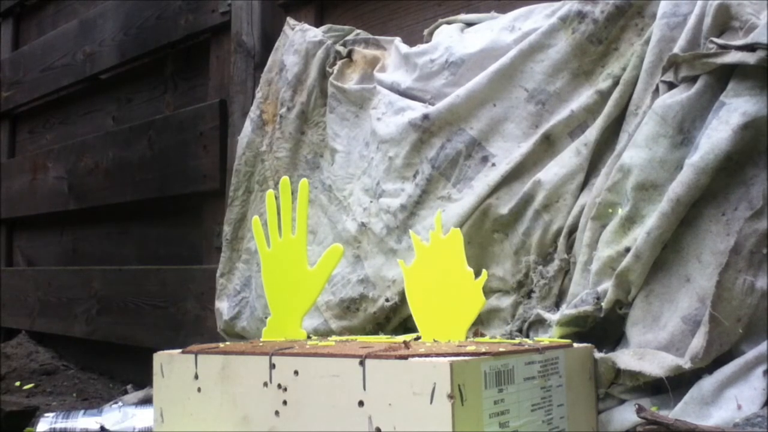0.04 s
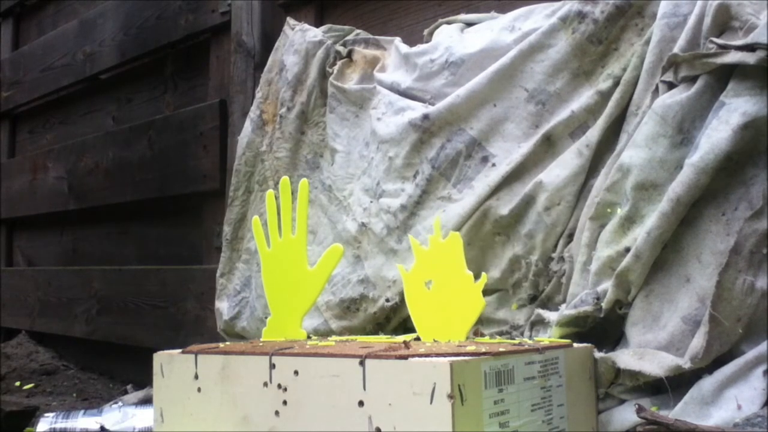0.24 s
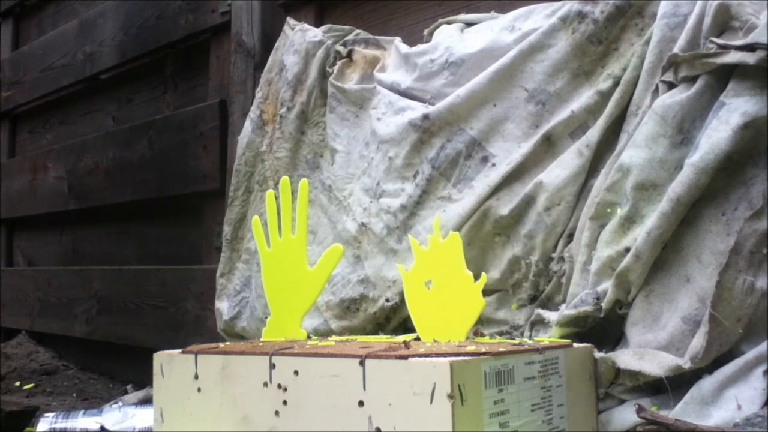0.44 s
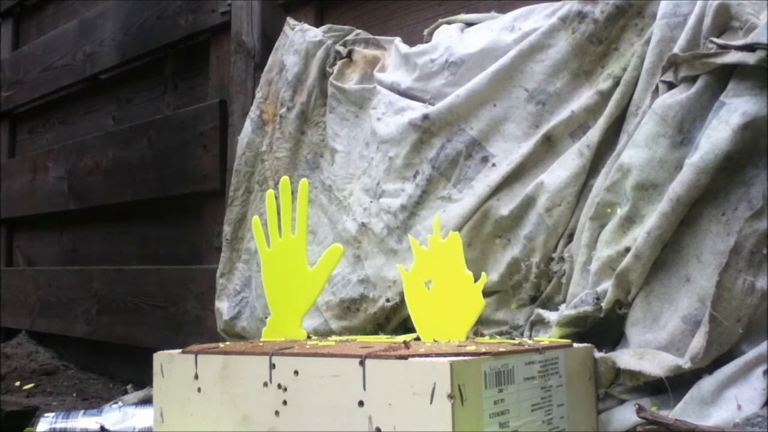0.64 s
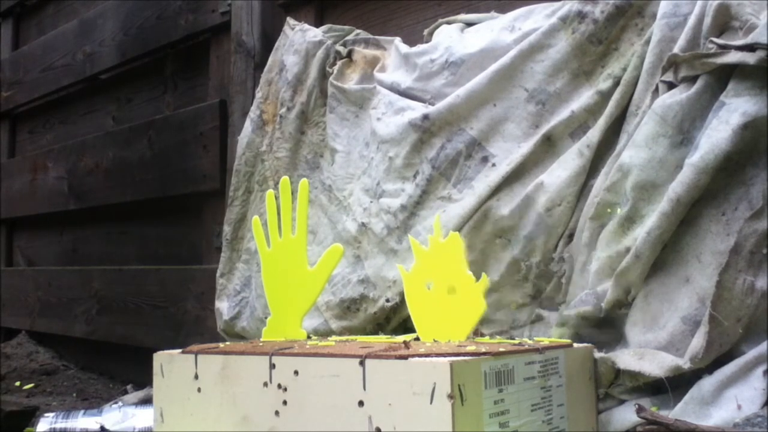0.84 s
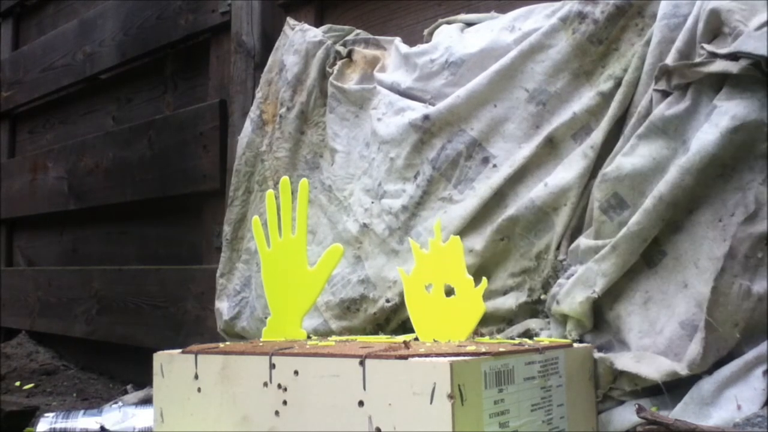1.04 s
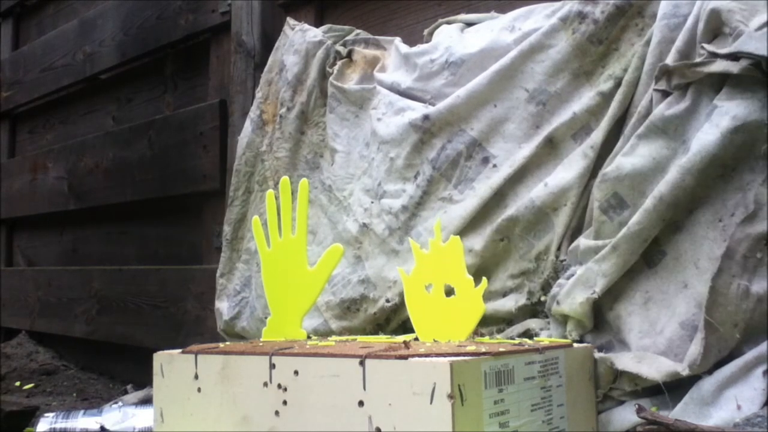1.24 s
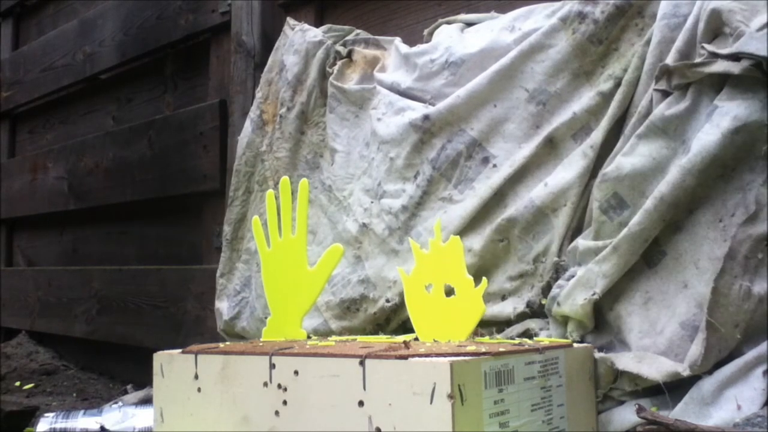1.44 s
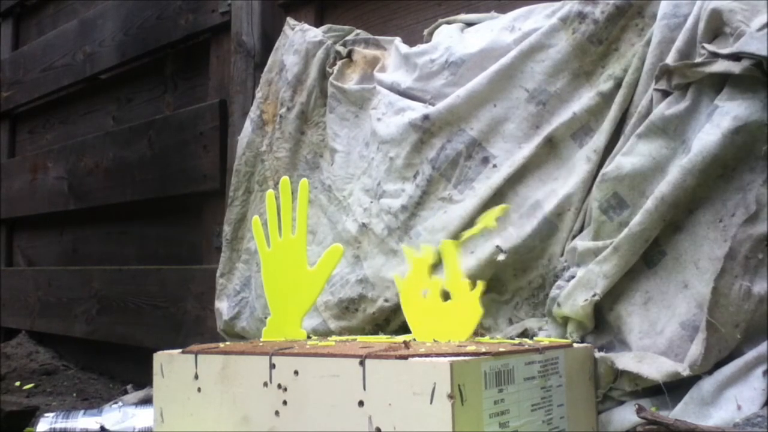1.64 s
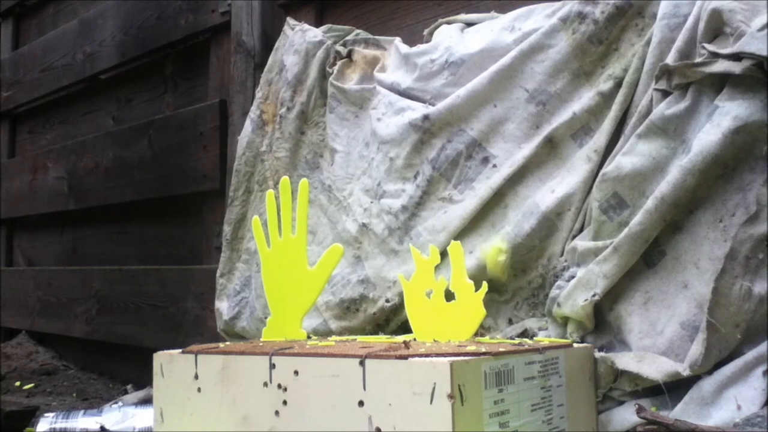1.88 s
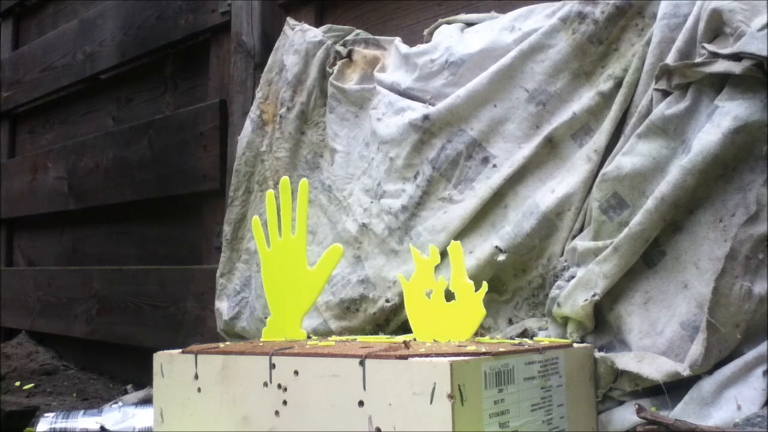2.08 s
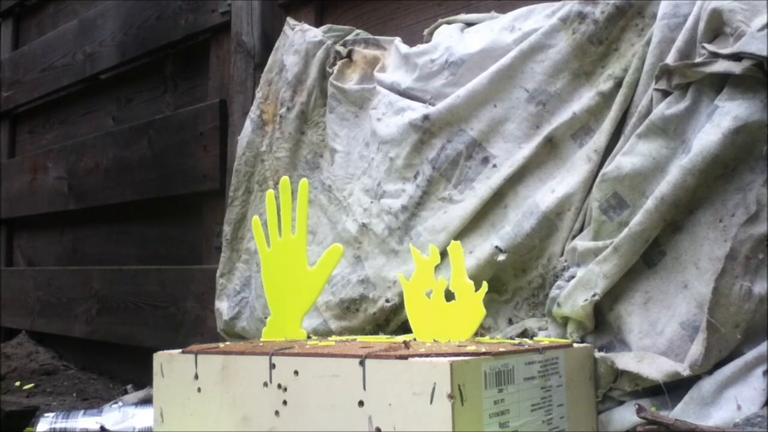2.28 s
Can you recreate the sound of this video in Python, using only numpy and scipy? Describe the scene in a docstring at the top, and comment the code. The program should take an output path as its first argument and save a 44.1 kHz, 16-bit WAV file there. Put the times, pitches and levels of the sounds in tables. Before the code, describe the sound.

A spring air rifle fires three times outdoors, each snap hitting plastic with a short echo.

```python
"""A fenced yard, where a spring air rifle fires three times. At each shot the piston rushes forward and
shakes the action into free vibration, the muzzle snaps and the spring clangs; the pellet then cracks
into a plastic target and thumps the backstop. Diffuse reflection makes the yard ring briefly.
Faint metallic tinks follow the second shot, and falling chips knock on a box after the third.
The outdoor hush drops at each shot, then jumps back."""
import sys
import numpy as np
from scipy import signal
from scipy.fft import rfft, irfft, next_fast_len
from scipy.io import wavfile
from scipy.ndimage import uniform_filter1d

SR = 44100
rng = np.random.default_rng(int(sys.argv[2]) if len(sys.argv) > 2 else 0)


def file_out(sig):
    """Save sig as 16-bit WAV at sys.argv[1]."""
    # one column per channel
    cols = np.atleast_2d(sig).T
    # limit, then scale
    lim = np.clip(cols, -1, 1)
    pcm = np.round(lim * 32767).astype(np.int16)
    wavfile.write(sys.argv[1], SR, pcm)


N = 101430
T = np.arange(SR // 2) / SR  # time within one event [s]

# Shots: (firing time [s], piston level [dB], splinter level [dB], splinter T60 [s],
# splinter tilt [dB/octave], target resonance [Hz], time the hush returns [s])
SHOTS = [(0.2033, -19, -11.5, 0.031, -1.5, 3550, .645), (.9736, -17.5, -11, 0.018, -0.07, 3940, 1.48),
         (1.7046, -20, -10.5, .026, -1.1, 3130, 2.4)]
# Noise of the piston stroke: (frequency [Hz], relative spectral density [dB])
PISTON_SPECTRUM = [(25, -43), (60, -14.5), (130, -13.5), (400, -8.5), (900, -0.5), (2000, -4.5), (3800, 0),
                   (7000, -4.5), (9500, -8), (12000, -9), (16000, -13.5)]
def rifle(time, piston_db):
    """Transient radiation: the piston's rush is a noise burst, the muzzle's snap a pressure pulse."""
    out = np.zeros(N)
    add(out, time, amp(piston_db) * noise(PISTON_SPECTRUM) * fade(t60=.027, attack=.0009, hold=.017))
    add(out, time + .0054, -amp(1.5) * pulse(width_s=.00012))
    return out


# Modes of the steel action: (frequency [Hz], level [dB])
ACTION_MODES = [(140, -29), (262, -31), (527, -33.5), (830, -35), (1050, -34), (1447, -29.5), (1900, -27),
                (2420, -30), (2950, -29.5), (3603, -22.5), (3846, -24.5), (4170, -30), (5700, -34)]
# Modes of the spring: (frequency [Hz], level [dB], T60 [s])
SPRING_MODES = [(7900, -20.5, 0.016), (8890, -14, 0.0059), (9450, -17, .012), (9730, -25.5, .03),
                (10200, -26.5, .03), (10400, -15.5, .004)]
# Contacts of the spring: (time after firing [s], gain [dB])
SPRING_CLANGS = [(.0088, 9), (.011, -10)]
def action_and_spring():
    """Free vibration: each shot excites the modes of the action once and those of the spring twice."""
    out = np.zeros(N)
    for time, *_ in SHOTS:
        add(out, time, ring([(hz, db, .08) for hz, db in ACTION_MODES], attack=.00033))
        for delay, clang_db in SPRING_CLANGS:
            add(out, time + delay, amp(clang_db) * ring(SPRING_MODES, attack=.0001))
    return out


# Noise of splintering plastic: (frequency [Hz], relative spectral density before tilt [dB])
SPLINTER_SPECTRUM = [(25, -29), (150, -3), (900, -6), (1400, -5.5), (2000, -6), (3300, -3), (5500, -3.5),
                     (8000, -5.5), (12500, -4.5), (16000, -16.5)]
def target(time, splinter_db, splinter_t60, tilt_db, ring_hz):
    """Impact and fracture: the pellet snaps through plastic, which rings briefly and splinters."""
    out = np.zeros(N)
    add(out, time, -amp(-2.5) * pulse(width_s=.0001))
    add(out, time, -amp(-3) * fade(t60=.0033, attack=.00003) * np.sin(2 * np.pi * ring_hz * T))
    spectrum = [(hz, db + tilt_db * np.log2(hz)) for hz, db in SPLINTER_SPECTRUM]
    splinters = noise(spectrum, spiky_db=2) * fade(splinter_t60, attack=.00011, hold=.0025)
    add(out, time, amp(splinter_db) * splinters)
    return out


# Impacts on the backstop: (time [s], knock level [dB], frequency [Hz], push level [dB], push width [s])
BACKSTOP_THUMPS = [(0.2236, -11.5, 520, -7.5, .0016), (0.9939, -12.5, 470, -17.5, .001),
                   (1.7237, -5.5, 490, -12, .0004)]
def backstop():
    """Heavy damping: the spent pellet lands with a dead knock and a low push of pressure."""
    out = np.zeros(N)
    for time, knock_db, hz, push_db, width_s in BACKSTOP_THUMPS:
        add(out, time, amp(knock_db) * fade(t60=.012, attack=.00087) * np.sin(2 * np.pi * hz * T))
        add(out, time, amp(push_db) * pulse(width_s))
    return out


# Landings of chips: (time [s], level [dB], T60 [s], centre frequency [Hz], click level re knock [dB])
CHIP_KNOCKS = [(2.0688, -51, 0.021, 2940, 7), (2.0965, -44.5, 0.024, 1110, -20),
               (2.1128, -44.5, 0.035, 1560, -0.5), (2.1232, -40.5, 0.018, 1640, -8),
               (2.1343, -41.5, 0.017, 2850, -20), (2.171, -51, 0.024, 2720, -22),
               (2.1825, -43, 0.0052, 2820, -23)]
# Modes of the box under the chips: (frequency [Hz], level re knock [dB])
BOX_MODES = [(612, -1), (850, -7.5), (1280, -13.5)]
def chips():
    """Impact excitation: each chip gives a narrow-band knock and a click, and sets the box ringing."""
    out = np.zeros(N)
    sigma_hz, box_t60 = 310, .035
    for time, db, t60, centre_hz, click_db in CHIP_KNOCKS:
        white = rng.standard_normal(len(T))
        knock = unit(filtered(white, lambda hz: np.exp(-.5 * ((hz - centre_hz) / sigma_hz) ** 2)))
        click = amp(click_db) * noise([(500, 5), (4500, -1.5), (8000, -12), (15000, -16)])
        contact = (knock + click) * fade(t60, attack=.00072, hold=.00067)
        box = ring([(hz, level, box_t60) for hz, level in BOX_MODES], attack=.00064)
        add(out, time, amp(db) * (contact + box))
    return out


# Faint metallic contacts: (time [s], level [dB], T60 [s])
TINKS = [(1.3655, -46, 0.047), (1.4033, -40, 0.0044)]
# Modes of the metal: (frequency [Hz], relative level [dB])
TINK_MODES = [(7400, -2), (9730, 1), (10400, -2), (12600, -4), (15300, -8)]
def tinks():
    """Modal ringing: tiny contacts excite high modes, which decay together with a hiss."""
    out = np.zeros(N)
    for time, db, t60 in TINKS:
        modes = ring([(hz, level, t60) for hz, level in TINK_MODES], attack=.00015)
        hiss = noise([(3000, -16), (9000, -7), (15000, -6)]) * fade(t60)
        add(out, time, amp(db) * (.5 * modes + .8 * hiss))
    return out


# Reverberation time of the yard: (frequency [Hz], T60 [s])
YARD_T60 = [(80, 0.79), (500, 0.553), (1500, 0.3534), (4000, 0.3219), (8000, 0.32), (15000, 0.2431)]
# Colour of its reflections: (frequency [Hz], gain [dB])
YARD_COLOUR = [(40, -28), (125, -12.5), (168, 1), (205, -10), (280, 1.5), (400, -6.5), (490, -2.5),
               (620, -1), (950, -5.5), (1600, 0), (1950, -3), (2350, 0.5), (3000, -9.5), (3850, -2),
               (5200, -5), (7500, 0), (10000, -5), (15000, -3)]
def yard(x):
    """Reverberation: fence and backdrop reflect early; the yard's longer tail loses its treble first."""
    hz, t, white = signal.stft(rng.standard_normal(SR), SR, nperseg=256)
    decay = np.exp(-np.log(1000) * t / along(YARD_T60, hz)[:, None])
    response = signal.istft(white * decay, SR, nperseg=256)[1]
    response /= np.linalg.norm(response)
    early = rng.standard_normal(len(T)) * fade(t60=.098)
    add(response, 0, amp(-.5) * early / np.linalg.norm(early))
    response = filtered(response, lambda f: amp(along(YARD_COLOUR, f)))
    out = np.zeros(N)
    add(out, .004, signal.fftconvolve(x, response))
    return out


def scattered(x, paths=8, cycle_s=.024):
    """Diffuse reflection: successive moments of a burst take different paths through the yard."""
    turn = np.arange(N) / SR / cycle_s * paths
    offsets = (np.abs((turn - k) % paths - paths / 2) for k in range(paths))
    crossfades = (np.cos(np.pi / 2 * np.minimum(offset, 1)) for offset in offsets)
    return sum(yard(x * share) for share in crossfades)


# Outdoor background, full and lowered: (frequency [Hz], relative spectral density [dB])
HUSH_SPECTRUM = [(15, -49.5), (25, -17.5), (130, 0), (189, -6.5), (255, -5.5), (587, -8.5), (729, -11.5),
                 (812, -10), (1510, -22), (10800, -27.5), (15800, -30)]
LOW_HUSH_SPECTRUM = [(15, -40), (25, -17), (96, -2.5), (449, -5), (654, -1), (981, -11), (1550, -10.5),
                     (1820, -14), (2150, -16), (5670, -22), (15800, -30)]
def hush():
    """Ambient noise: a broadband hush gives way to a quieter one at each shot, then jumps back."""
    t = np.arange(N) / SR
    after_shot = sum(1. * ((t > start) & (t < end)) for start, *_, end in SHOTS)
    dip = np.clip(uniform_filter1d(after_shot, size=200), 0, 1)
    full = amp(-51) * noise(HUSH_SPECTRUM, size=N)
    lowered = amp(-57.5) * noise(LOW_HUSH_SPECTRUM, size=N)
    return (1 - dip) * full + dip * lowered


def ring(modes, attack):
    """Modal superposition: damped sines (frequency [Hz], level [dB], T60 [s]), varied at each blow."""
    return sum(amp(db + rng.normal()) * fade(t60, attack) * np.sin(2 * np.pi * (hz * T + rng.random()))
               for hz, db, t60 in modes)


def pulse(width_s):
    """Bipolar pressure pulse: a compression lasting width_s, then a rarefaction."""
    return (1 - T / width_s) * np.exp(-T / width_s)


def noise(spectrum, spiky_db=0, size=len(T)):
    """Spectral shaping: coloured noise of rms 1; spiky_db spreads the sample levels into crackle."""
    white = rng.standard_normal(size) * amp(spiky_db * rng.standard_normal(size))
    return unit(filtered(white, lambda hz: amp(along(spectrum, hz))))


def fade(t60, attack=.000203, hold=0):
    """Exponential decay: the envelope rises and, after the hold, falls 60 dB per t60; times in s."""
    return (1 - np.exp(-T / attack)) * np.exp(-np.log(1000) * np.maximum(T - hold, 0) / t60)


def filtered(x, gain):
    """Zero-phase filtering: the spectrum of x is multiplied by gain(frequency)."""
    size = next_fast_len(len(x) + SR // 2)
    return irfft(rfft(x, size) * gain(np.fft.rfftfreq(size, 1 / SR)), size)[:len(x)]


def along(points, hz):
    """Interpolation of (frequency [Hz], value) points on a logarithmic frequency axis."""
    frequencies, values = np.transpose(points)
    return np.interp(np.log(hz + 1), np.log(frequencies + 1), values)


def amp(db):
    """Amplitude ratio of a level in decibels."""
    return 10 ** (np.asarray(db) / 20)


def unit(x):
    """Normalisation to rms 1."""
    return x / np.sqrt(np.mean(x ** 2) + 1e-20)


def add(track, time, sound):
    """Superposition of a sound on a track, starting at time [s]."""
    part = track[max(round(time * SR), 0):][:len(sound)]
    part += sound[:len(part)]


def scene():
    """Linear superposition: direct sound, the yard's reflections and the ambient hush add in mono."""
    flight_s = .0181
    # (direct sound, gain into the yard's reflections [dB])
    sources = [(action_and_spring(), -12.5), (backstop(), -14.5), (tinks() + chips(), -8)]
    for time, piston_db, *strike, _ in SHOTS:
        sources += [(rifle(time, piston_db), -5), (target(time + flight_s, *strike), -6)]
    direct = sum(x for x, _ in sources)
    reflected = scattered(sum(amp(db) * x for x, db in sources))
    return (direct + reflected + hush())[None]


def record(dry):
    """Band limiting and saturation: the microphone thins deep bass, rounds peaks and cuts top treble."""
    low_cut_hz, top_hz = 35, 15900
    x = signal.sosfilt(signal.butter(2, low_cut_hz, "high", fs=SR, output="sos"), dry[0])
    rounded = x / (1 + np.abs(x) ** 6) ** (1 / 6)
    return filtered(rounded, lambda hz: np.clip((top_hz - hz) / 200 + .5, 0, 1))[None]


dry = scene()
out = record(dry)
file_out(out)
```